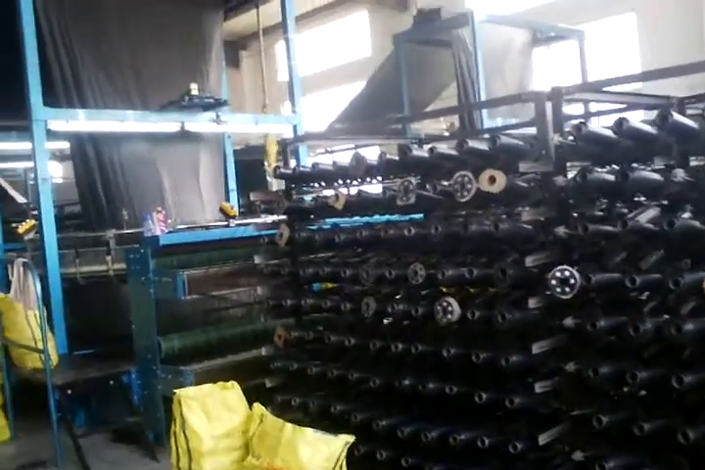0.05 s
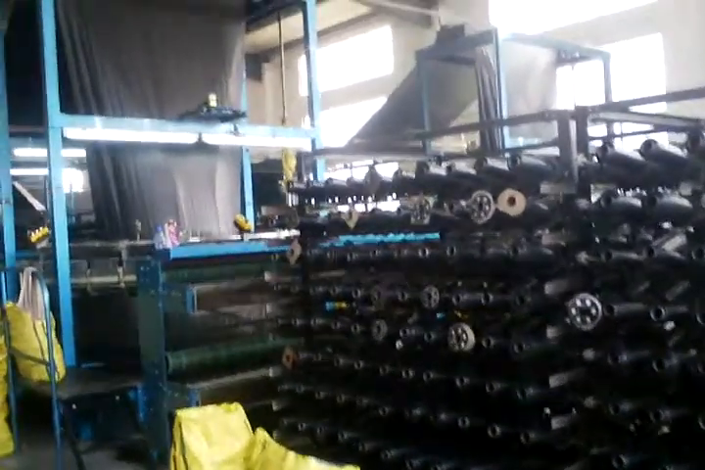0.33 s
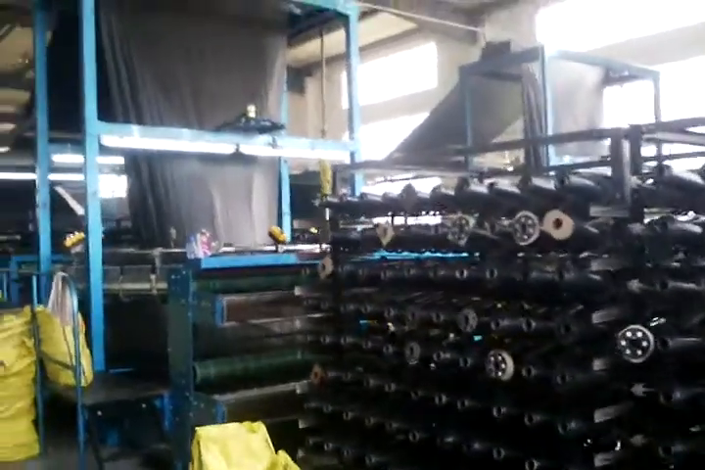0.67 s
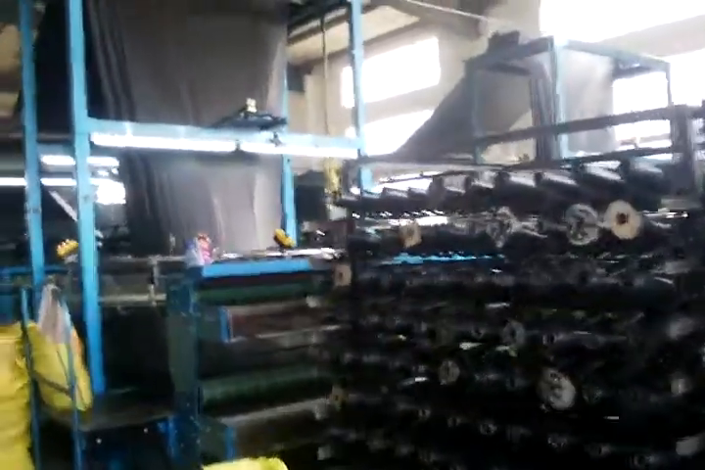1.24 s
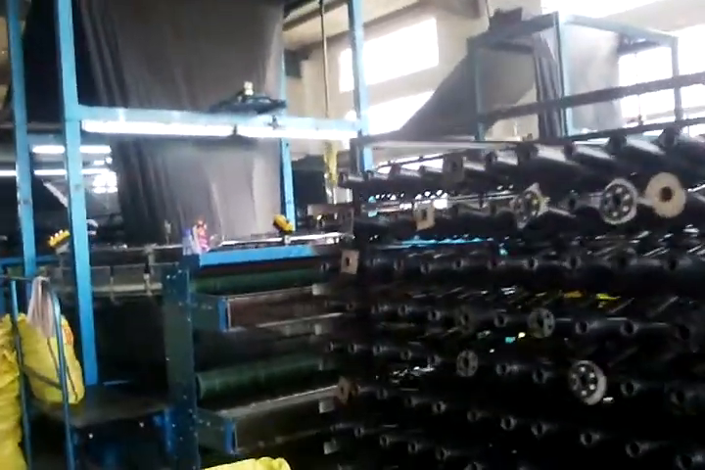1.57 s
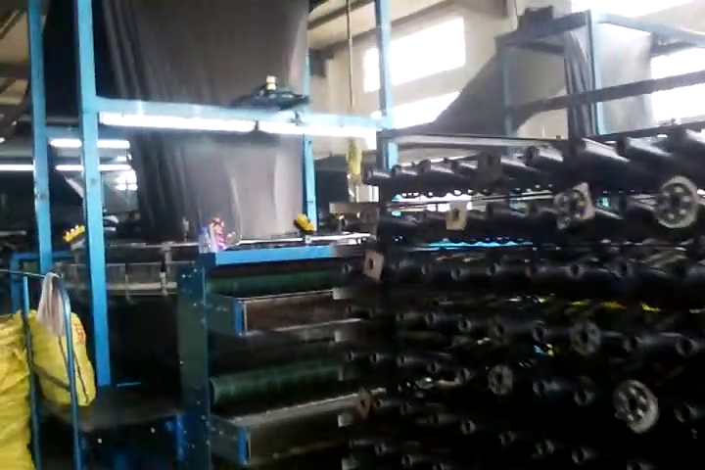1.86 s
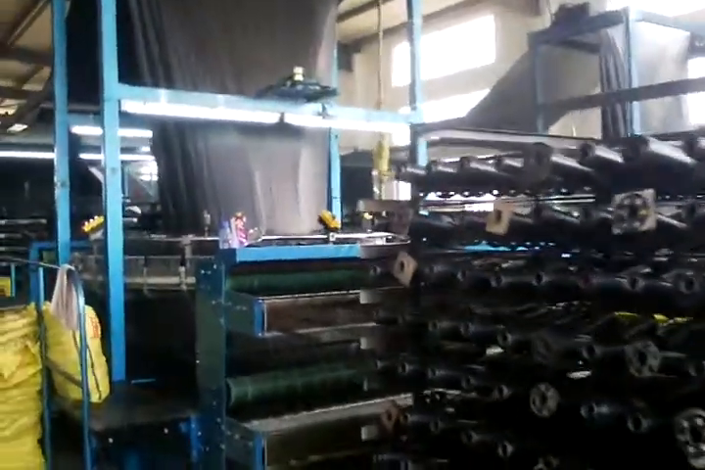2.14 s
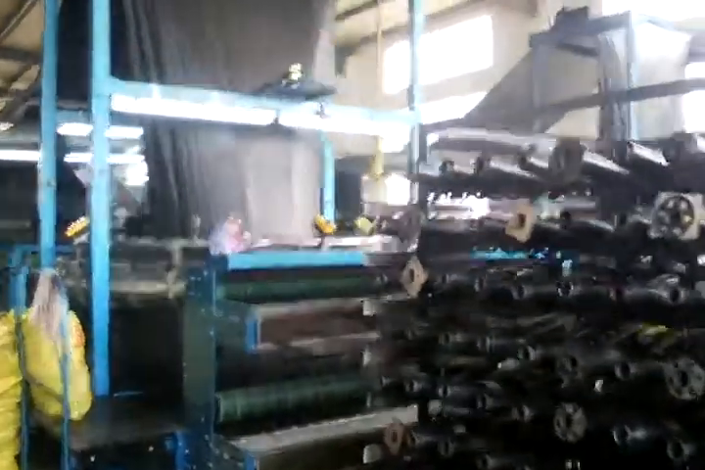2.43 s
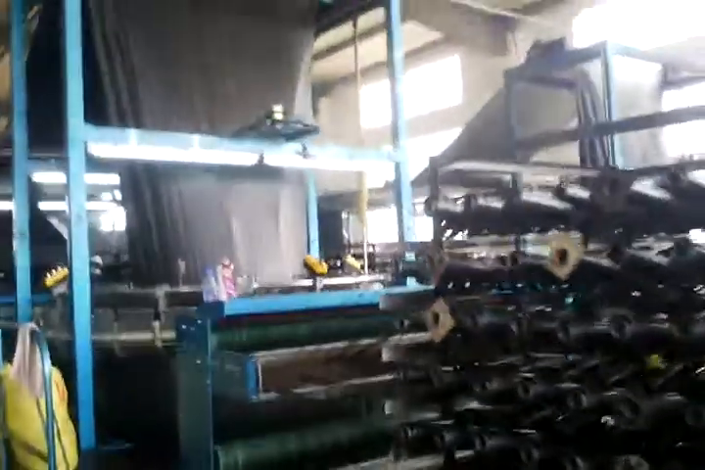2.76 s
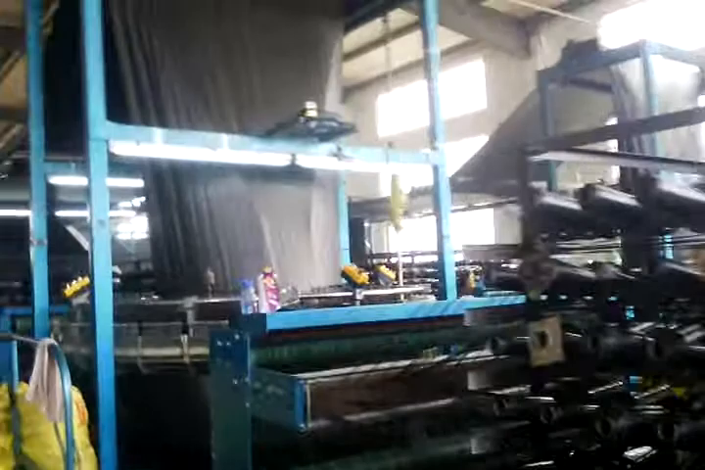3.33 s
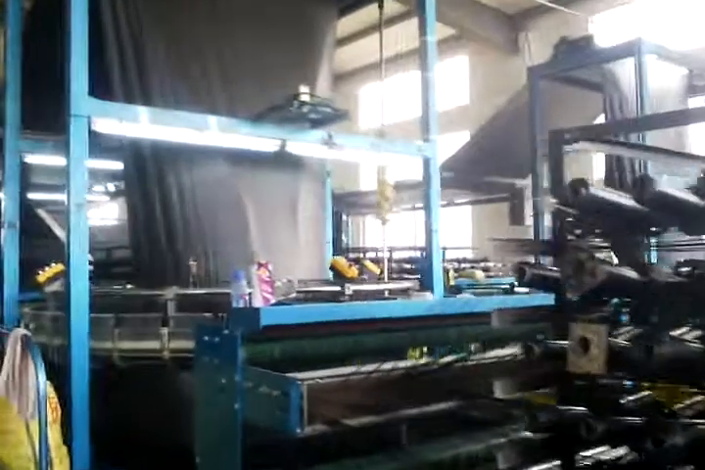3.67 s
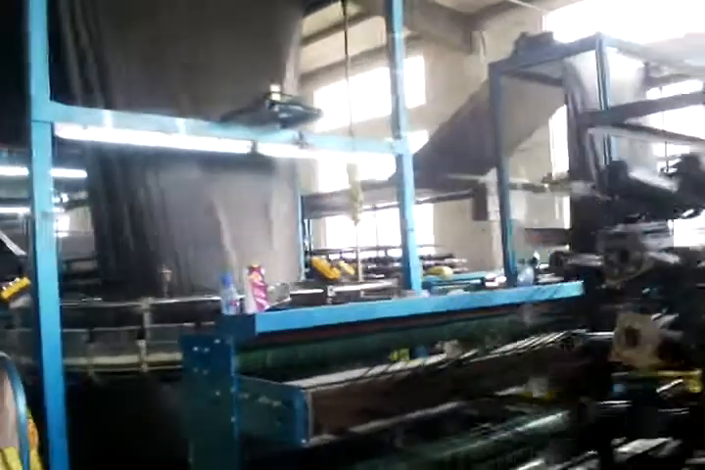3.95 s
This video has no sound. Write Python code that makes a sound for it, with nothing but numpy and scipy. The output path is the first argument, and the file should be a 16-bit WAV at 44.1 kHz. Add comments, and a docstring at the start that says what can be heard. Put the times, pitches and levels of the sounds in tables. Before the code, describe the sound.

Many looms run together in a large factory hall, a loud hissing roar with ringing steel and low thuds. After a second the phone microphone turns the din down; it warbles briefly, then stays quiet and even.

```python
"""A large weaving hall. The impacts of many looms superpose into a hissing roar, steel parts ring at
their resonances, and the nearest frame drones and thuds in its low modes. A mono phone picks this up.
After about a second its noise suppressor turns the din down band by band on a set schedule, treble
first and bass last; the remainder warbles for a while, then settles to a quiet, even roar."""
import sys
import numpy as np
from scipy import signal
from scipy.fft import rfft, irfft
from scipy.io import wavfile
from scipy.ndimage import uniform_filter1d

SR = 44100
rng = np.random.default_rng(int(sys.argv[2]) if len(sys.argv) > 2 else 0)


def waveform_to_disk(signal):
    """Save audio, clipped to [-1, 1], as 16-bit WAV at the path in sys.argv[1]."""
    frames = np.transpose(np.atleast_2d(signal))
    scaled = np.clip(frames, -1, 1) * 32767
    samples = np.round(scaled).astype(np.int16)
    wavfile.write(sys.argv[1], SR, samples)


N = 176400
T = np.arange(N) / SR
BIN_HZ = np.maximum(np.arange(N // 2 + 1) * SR / N, 1)

# Resonances of the steel parts: f/Hz, bandwidth/Hz, level/dB
STEEL_MODES = [(274, 14, -35.5), (729, 30, -39.5), (1145, 5, -48), (1215, 14, -46.5), (1485, 12, -44),
               (2040, 55, -35.5), (2316, 69, -52.5), (3155, 17, -46.5), (3650, 11, -56), (3950, 31, -39),
               (4036, 18, -39.5), (4030, 10, -40.5), (4430, 17, -47), (4620, 16, -50), (6200, 30, -50)]
# Modes of the nearest loom's frame: f/Hz, bandwidth/Hz, relative level/dB
FRAME_MODES = [(126.9, 22, -5), (160.2, 31.2, 1), (196.8, 23.3, 1)]
# Thuds of the nearest loom: t/s, relative level/dB
LOOM_THUDS = [(.05, 3.5), (.17, 2.5), (.24, -20), (.31, 0.5), (.39, -1), (.49, -2), (.57, 4), (.65, 0),
              (.75, -8), (.845, 4.5), (.97, -3), (1.02, -8.5), (1.15, -0.5), (1.25, -2), (1.35, 5),
              (1.41, 5.5), (1.51, 1), (1.74, 2.5), (1.87, 5), (2.02, 4), (2.07, 3.5), (2.15, -8),
              (2.26, -1), (2.366, 3.5), (2.55, 6.5), (2.69, -2), (2.77, -5), (2.87, 1), (3.085, 2),
              (3.27, 3.5), (3.36, 1.5), (3.42, 5.5), (3.612, 0), (3.72, -0.5), (3.79, 0), (3.88, -3),
              (3.97, -2.5)]
# Spectral envelope of the massed clatter: f/Hz, relative level/dB
CLATTER_SPECTRUM = [(25, -21), (45, -17.5), (68, -29.5), (90, -19), (120, -4), (200, 0.5), (300, 0),
                    (430, 0), (540, -2.5), (720, -1.5), (1000, -4), (1600, -5.5), (2100, -4), (2800, -6.5),
                    (3500, -8.5), (4050, -6), (4600, -5.5), (5000, -8.5), (5750, -8.5), (6400, -6.5),
                    (7000, -9.5)]
# Onset of suppression in each band: f/Hz, start t/s, time constant/s, attenuation/dB
SUPPRESSOR_BANDS = [(50, 1.04, .3, 18.5), (110, 0.91, .36, 21), (171, 1.15, 0.28, 22.5),
                    (398, 1.024, 0.2, 23.5), (773, 0.97, .17, 24), (1100, 0.997, 0.09, 24),
                    (1920, 1.017, 0.072, 23), (2380, 0.84, 0.21, 24.5), (4400, 0.86, 0.18, 22.5),
                    (6260, 0.84, 0.26, 27), (7000, 0.86, 0.18, 24)]
# Brief swells and dips of single bands: t/s, half duration/s, f/Hz, half width/octaves, gain/dB
BAND_SWELLS = [(0.934, 0.023, 1000, 0.74, 0), (1.0, 0.072, 252, 0.51, 6), (1.04, 0.034, 2070, 0.095, 8),
               (1.116, 0.02, 620, 0.26, 11), (1.19, 0.036, 250, 0.93, -4.5), (1.21, 0.03, 730, 0.12, 15.5),
               (1.28, 0.048, 390, .35, 11.5), (1.42, 0.22, 202, 0.94, 4), (1.48, 0.028, 189, 0.5, 2.5),
               (1.526, 0.033, 200, 0.34, 12.5), (1.553, 0.01, 690, 0.86, 7.5), (1.62, .04, 169, 0.9, -6),
               (1.6, 0.021, 7100, 0.086, 10), (1.73, .04, 176, 0.72, 12), (1.788, 0.013, 1070, 0.38, 9),
               (1.797, 0.015, 6700, .08, 8), (1.87, 0.011, 170, .6, 6.5), (1.943, 0.02, 6960, .05, 11),
               (2.003, 0.077, 174, 0.49, 11.5), (2.6, 0.041, 720, 0.32, 4.5), (3.677, 0.024, 1400, 1.1, 3)]
# Treble response of the phone's speech band: f/Hz, gain/dB
PHONE_RESPONSE = [(6950, 1.5), (7300, -4.5), (7700, -13.5), (7980, -50), (8250, -23), (8550, -24),
                  (9000, -41.5)]


def amplitude(db):
    """Amplitude ratio for a level in decibels."""
    return 10 ** (np.asarray(db) / 20)


def at_level(x, db):
    """Scaling to a given rms level."""
    return x * amplitude(db) / np.sqrt(np.mean(x ** 2))


def interpolate(hz, table, column=1):
    """Interpolation of one table column on a logarithmic frequency axis."""
    rows = np.array(table)
    return np.interp(np.log(hz), np.log(rows[:, 0]), rows[:, column])


def colour(x, table):
    """Linear filtering: the spectrum is multiplied by a gain curve."""
    return irfft(rfft(x) * amplitude(interpolate(BIN_HZ, table)), N)


def resonance(hz, bandwidth):
    """Random forcing of two equal resonators in cascade: steep skirts, unit rms."""
    response = 1 / (1 + 1j * (BIN_HZ / hz - hz / BIN_HZ) * hz / bandwidth)
    return at_level(irfft(rfft(rng.standard_normal(N)) * response ** 2, N), 0)


def modal_sum(modes):
    """Superposition of independently driven modes."""
    return sum(amplitude(db) * resonance(hz, bandwidth) for hz, bandwidth, db in modes)


def flutter(rate_hz):
    """Random modulation: held values, smoothed twice, of unit rms."""
    hold = int(SR / rate_hz)
    steps = rng.standard_normal(N)[np.arange(N) // hold]
    return at_level(uniform_filter1d(uniform_filter1d(steps, hold), hold), 0)


def steel_ringing():
    """Forced vibration: rollers, rings and guides resonate without pause."""
    return modal_sum(STEEL_MODES)


def thud_force(sigma_s=0.018):
    """Pulsed excitation: each thud is a short Gaussian surge of shaking."""
    return sum(amplitude(db) * np.exp(-0.5 * ((T - when) / sigma_s) ** 2) for when, db in LOOM_THUDS)


def loom_frame(force, drone_db=-27, thud_db=-28):
    """Modal vibration: the near frame drones, and each thud drives the same modes to a set strength."""
    drone, boom = modal_sum(FRAME_MODES), modal_sum(FRAME_MODES)
    envelope = uniform_filter1d(np.abs(signal.hilbert(boom)), size=500)
    return at_level(drone, drone_db) + at_level(boom / envelope * force, thud_db)


def loom_clatter(force, clicks_per_s=900, hall_t60_s=0.76, flutter_db=0.37):
    """Incoherent addition: near shuttle clicks, their reverberation and the far looms form one roar."""
    clicks = (rng.random(N) < clicks_per_s / SR) * rng.standard_normal(N)
    hall_response = rng.standard_normal(N) * np.exp(-np.log(1000) * T / hall_t60_s)
    reverberation = irfft(rfft(clicks) * rfft(hall_response), N)
    far_looms = rng.standard_normal(N)
    din = far_looms + at_level(reverberation, db=-9.5) + at_level(clicks, db=-10)
    din = colour(din, CLATTER_SPECTRUM) * amplitude(flutter_db * flutter(rate_hz=30.52))
    beat = 1 + 0.031 * force  # the roar rises slightly with each thud
    return at_level(din * beat, db=-14.5)


def scene():
    """Superposition of the sources, alike in both channels."""
    force = thud_force()
    return np.tile(loom_clatter(force) + steel_ringing() + loom_frame(force), (2, 1))


def short_time_spectrum(x):
    """Fourier analysis in overlapping windows: f/Hz as a column, t/s and the spectra."""
    hz, t, spectra = signal.stft(x, SR, nperseg=1024, noverlap=768)
    return np.maximum(hz, 1)[:, None], t, spectra


def resynthesize(spectra, gain_db):
    """Overlap-add synthesis of the weighted spectra."""
    return signal.istft(spectra * amplitude(gain_db), SR, nperseg=1024, noverlap=768)[1][:N]


def noise_suppressor(x, settle_s=2.085, ramp_s=0.033, rebound_s=0.31, extra_cut_db=1):
    """Spectral attenuation on a set schedule; until it settles, power above a band's mean leaks out."""
    hz, t, spectra = short_time_spectrum(x)
    power = uniform_filter1d(np.abs(spectra) ** 2, size=3, axis=0)
    power = uniform_filter1d(power, size=5, axis=1) + 1e-18
    excess_db = 10 * np.log10(np.abs(power / power.mean(axis=1, keepdims=True)))
    start_s, lag_s, depth_db = (interpolate(hz, SUPPRESSOR_BANDS, column) for column in (1, 2, 3))
    cut_progress = 1 - np.exp(-(np.maximum(t - start_s, 0) / lag_s) ** 1.17)
    settled = np.clip((t - settle_s) / ramp_s, 0, 1)
    # the leak is greatest partway through the fade
    leak = 2 * np.sqrt(cut_progress) * (1 - cut_progress) + 0.17 * cut_progress
    warble_db = leak * excess_db - extra_cut_db * cut_progress
    rebound_db = 3.5 * np.exp(-((t - settle_s) / rebound_s) ** 2)
    gain_db = -depth_db * cut_progress + (1 - settled) * warble_db + settled * rebound_db
    return resynthesize(spectra, np.minimum(gain_db, 0))


def band_swells(x):
    """Amplitude modulation: single bands, mostly low ones, swell and dip briefly."""
    hz, t, spectra = short_time_spectrum(x)
    gain_db = 0
    for when, half_s, centre_hz, octaves, db in BAND_SWELLS:
        band = np.exp(-0.5 * (np.log2(hz / centre_hz) / octaves) ** 2)
        gain_db += db * band * np.exp(-((t - when) / half_s) ** 2)
    return resynthesize(spectra, gain_db)


def record(dry, cutoff_hz=9100):
    """Band limiting: one microphone's signal is noise-suppressed, then confined to the speech band."""
    suppressed = noise_suppressor(dry.mean(axis=0))
    mono = colour(band_swells(suppressed), PHONE_RESPONSE)
    lowpass = signal.ellip(8, 0.2, 80, cutoff_hz, fs=SR, output="sos")
    return np.tile(signal.sosfilt(lowpass, mono), (2, 1))


dry = scene()
out = record(dry)
waveform_to_disk(out)
```